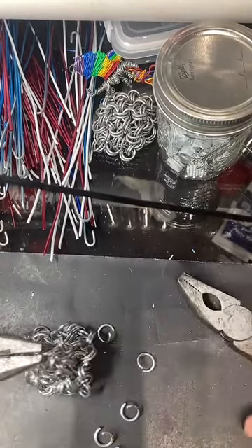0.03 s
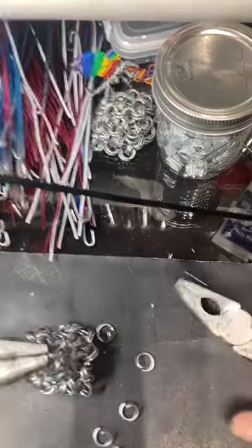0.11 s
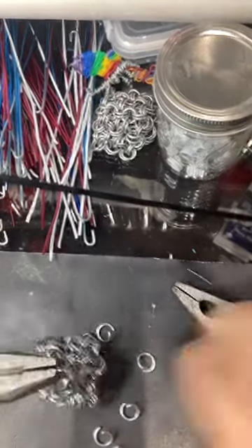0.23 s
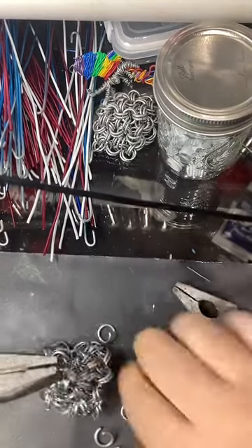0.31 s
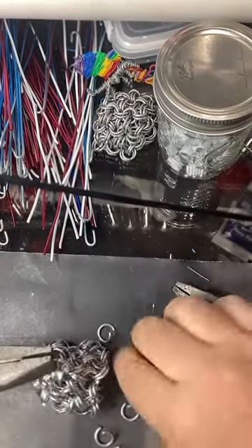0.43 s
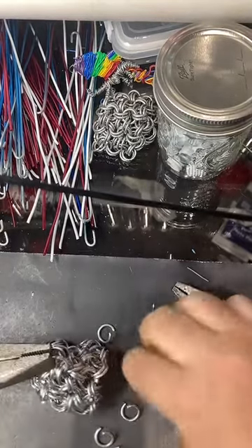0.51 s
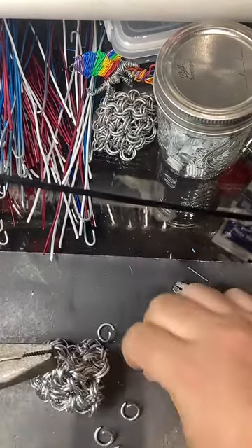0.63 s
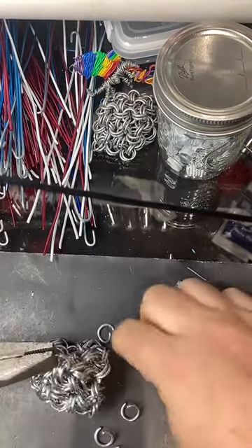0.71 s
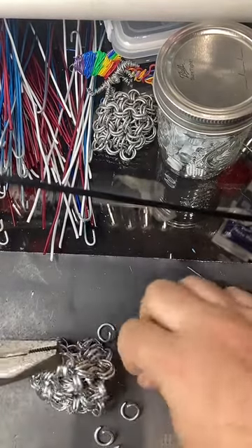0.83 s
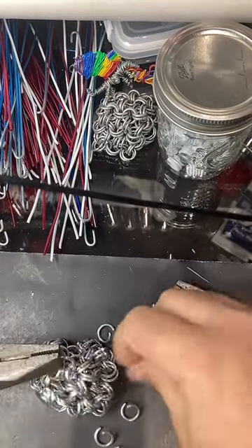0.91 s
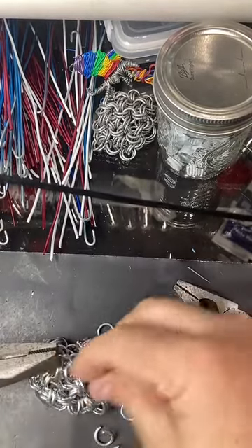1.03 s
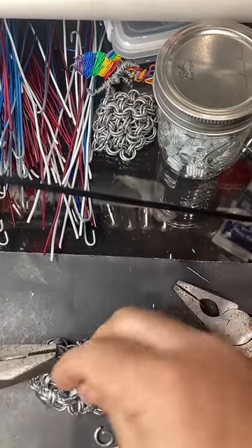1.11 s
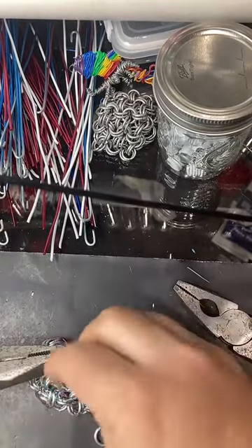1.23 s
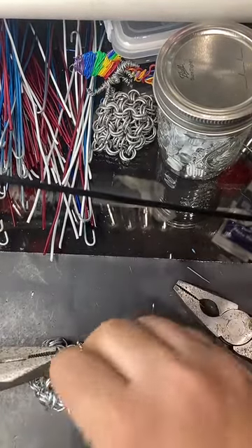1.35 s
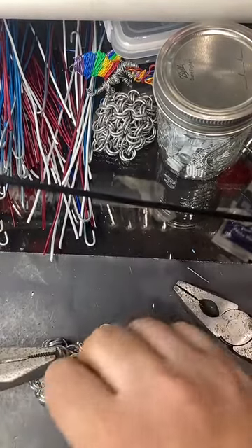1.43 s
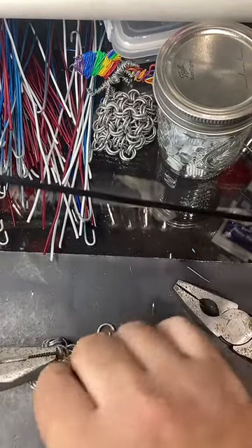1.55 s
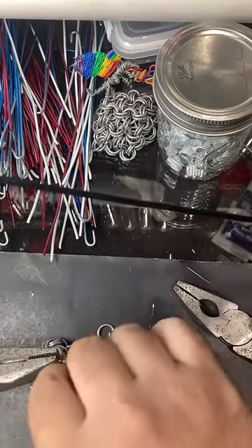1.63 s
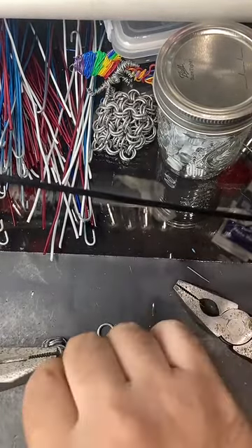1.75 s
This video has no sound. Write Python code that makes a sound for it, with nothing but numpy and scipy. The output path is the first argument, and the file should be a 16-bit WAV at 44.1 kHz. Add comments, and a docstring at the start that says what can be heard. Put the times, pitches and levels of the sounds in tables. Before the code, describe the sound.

Close pickup in a small room: tiny ring clicks, then pliers hit the table in one hard, rattling clack with a low thud and short metallic ring, followed by faint brushing, scattered clinks and quiet hum.

```python
"""Chain mail rustles and clicks; within a quarter second steel pliers land on a work table, clattering loudly.
Contacts are decaying noise bursts plus a chirped thud; pliers, table and a jar ring on as decaying sines.
Then fingers slide over the table and pick at the mail: swells of random slips, clinks of short modal rings.
A close pickup in a small room: centred direct sound, treble spread wide, air noise and a low mains hum."""
import sys
import numpy as np
from scipy import signal
from scipy.fft import rfft, irfft
from scipy.io import wavfile

SR = 44100
rng = np.random.default_rng(int(sys.argv[2]) if len(sys.argv) > 2 else 0)


def transcribe(signal):
    """Save signal, clipped to [-1, 1], as a 16-bit WAV file at the path in sys.argv[1]."""
    frames = np.atleast_2d(signal).T
    limited = np.clip(frames, -1, 1)
    pcm = np.round(limited * 32767).astype(np.int16)
    wavfile.write(sys.argv[1], SR, pcm)


N = 79380

# Contacts of the pliers as they land and rock.
# Each row: start in seconds, then levels of thud, knock, clatter and steel tick in dB.
CONTACTS = [(0.2376, -15, -18, -16.5, -27), (0.2411, -33.5, -9, -24.5, -7), (0.247, -31, -17.5, -15, -28.5),
            (0.249, -27.5, -11, -8.5, -20), (0.2550, -24, -16.5, -29.5, -20.5),
            (0.2650, -28.5, -23, -53, -34.5), (0.274, -39, -21.5, -18.5, -19), (0.2889, -38, -36, -32, -29),
            (0.3104, -33.5, -31, -26.5, -28), (0.3226, -35, -27, -36, -49.5),
            (0.345, -27, -62.5, -49, -54.5)]
CLICK_ROOM_SHARE = 0.45  # part of the ring clicks that passes through the room


def amp(db):
    """Decibels to gain."""
    return 10 ** (np.asarray(db) / 20)


def unit(x):
    """Scales to rms 1."""
    return x / np.sqrt(np.mean(x ** 2) + 1e-20)


def read(points, hz):
    """Interpolates a table on a log-frequency axis."""
    point_hz, value = np.transpose(points)
    return np.interp(np.log(hz + 1), np.log(point_hz + 1), value)


def add(mix, start_s, sound):
    """Lays a sound into the mix at its start time."""
    part = mix[max(round(start_s * SR), 0):][:len(sound)]
    part += sound[:len(part)]


def noise(colour, size):
    """Dense vibration of rms 1: the given spectrum with random phases."""
    hz = np.fft.rfftfreq(size, 1 / SR)
    phases = np.exp(2j * np.pi * rng.random(len(hz)))
    return unit(irfft(phases * amp(read(colour, hz)), size))


def decay(t, t60_s):
    """Exponential fall by 60 dB in t60."""
    return np.exp(-np.log(1000) * t / t60_s)


def struck(t, rise_s, t60_s):
    """Envelope of a blow: linear rise, exponential fall."""
    return np.minimum(t / rise_s, 1) * decay(t, t60_s)


def pliers():
    """Each contact gives a thud, a knock, a clatter and a steel tick; tiny bounces roughen the last two."""
    # Spectra of the parts. Each row: frequency in Hz, level in dB.
    knock = [(60, -34.5), (220, -13), (310, 0), (440, -7.5), (600, -0.5), (1080, -1.5), (1300, -8),
             (1750, -2), (2200, -20), (5000, -26), (13000, -54)]
    clatter = [(400, -19), (1500, -2.5), (2500, -1), (3300, -2.5), (3850, -1.5), (4250, -7), (4700, 0.5),
               (5150, -4.5), (6300, -10), (13000, -34)]
    tick = [(2000, -24.5), (5500, -12), (7000, -3.5), (8500, 5.5), (9800, -3.5), (11000, -9), (12300, -5.5),
            (13500, -30.5)]
    # spectrum, rise in s, t60 in s, roughened
    parts = [(knock, 0.00087, 0.055, False), (clatter, 0.0014, 0.066, True), (tick, 0.00045, 0.016, True)]
    crunch_per_s, crunch_db = 1500, 0.5
    out, t = np.zeros(N), np.arange(8192) / SR
    for start_s, thud_db, *levels_db in CONTACTS:
        add(out, start_s, amp(thud_db) * thud())
        bounces = rng.standard_normal(1024)
        bounce_db = crunch_db * np.interp(t * crunch_per_s, np.arange(len(bounces)), bounces)
        crunch = unit(amp(bounce_db))
        for db, (colour, rise_s, t60_s, roughened) in zip(levels_db, parts):
            burst = noise(colour, size=len(t)) * struck(t, rise_s, t60_s)
            add(out, start_s, amp(db) * (crunch if roughened else 1) * burst)
    return out


def thud(tilt_db_per_octave=0, size=8192):
    """One push runs through the table top as a falling chirp: delay goes as 1 / sqrt(frequency)."""
    # How the table top gives under a push. Each row: frequency in Hz, level in dB per Hz.
    push_colour = [(20, -33.5), (45, -9.5), (75, 0), (125, 2), (200, -5), (300, -0.5), (420, -6.5),
                   (620, -12), (900, -26), (3000, -64)]
    bend_delay_s, bend_hz = 0.01544, 98.8  # delay of the bending wave at bend_hz
    hz = np.fft.rfftfreq(size, 1 / SR)
    lag_turns = 2 * bend_delay_s * np.sqrt(bend_hz * hz)
    level_db = read(push_colour, hz) + tilt_db_per_octave * np.log2(1 + hz / bend_hz)
    wave = irfft(amp(level_db) * np.exp(-2j * np.pi * lag_turns), size)[:size // 2]
    return wave / np.abs(wave).max()


def steel_ring():
    """Every contact rings the same modes of the pliers, as hard as it clatters."""
    # Modes of the pliers. Each row: frequency in Hz, level in dB.
    steel_modes = [(1565, -17), (1610, -15), (1792, -18), (1884, -19), (2332, -15.5), (2500, -19),
                   (2767, -20.5), (3240, -22), (3604, -25), (3683, -21.5), (4680, -23), (5122, -22),
                   (5460, -26.5), (8910, -27)]
    rise_s, t60_s = 0.002, 0.15
    out, t = np.zeros(N), np.arange(SR // 2) / SR
    for start_s, _, _, clatter_db, _ in CONTACTS:
        tone = sum(amp(db) * np.sin(2 * np.pi * (hz * t + rng.random())) for hz, db in steel_modes)
        add(out, start_s, amp(clatter_db) * tone * struck(t, rise_s, t60_s))
    return out


def table_ring():
    """Table and jar ring in decaying modes; the table's fade faster from 0.57 s, while the jar's ring on."""
    # Modes of the table and of the jar that stands by. Each row: frequency in Hz, level in dB, t60 in seconds.
    table_modes = [(112.6, -24.5, 0.82), (174.5, -23.5, 0.51), (301, -14, 0.085), (521.3, -23.5, 0.29),
                   (643.8, -14.5, 0.065), (653.5, -21, 0.63), (806, -18.5, 0.14), (989.5, -19, 0.19),
                   (1011.5, -21, 0.19), (1084.5, -17.5, 0.17), (1108, -22.5, 0.2), (1220, -25.5, 0.37)]
    jar_modes = [(325, -42, 2.1), (368, -47.5, 2.4), (938, -53.5, 2), (1222, -58.5, 5.1),
                 (1320, -51.5, 1.6), (2070, -56, 2.6), (3290, -66.5, 3.7), (3450, -49, 1.1),
                 (3725, -58.5, 2.6), (3763, -64.5, 4.9)]
    start_s, rise_s = 0.2415, 0.005
    faster_fade_s, faster_fade_t60_s = 0.57, 0.22
    out, t = np.zeros(N), np.arange(N) / SR
    fade = decay(np.maximum(start_s + t - faster_fade_s, 0), faster_fade_t60_s)
    for modes, gain in [(table_modes, fade), (jar_modes, 1)]:
        for hz, db, t60_s in modes:
            tone = np.sin(2 * np.pi * hz * t) * struck(t, rise_s, t60_s)
            add(out, start_s, amp(db) * gain * tone)
    return out


def bumps():
    """Hand and tool meet the table with dull thumps, chirped like the thuds."""
    # Each row: start in seconds, level in dB, brightness in dB per octave.
    bump_rows = [(0.1746, -34.5, -2), (0.203, -38, -21), (0.303, -21, -6), (0.660, -44, -11),
                 (0.689, -52.5, -20.5), (0.754, -40.5, -17.5), (0.773, -42, -21.5), (0.879, -43.5, -16),
                 (1.361, -50.5, -5), (1.485, -47, 2)]
    out = np.zeros(N)
    for start_s, db, tilt_db_per_octave in bump_rows:
        add(out, start_s, amp(db) * thud(tilt_db_per_octave))
    return out


def clicks():
    """Small rings snap against each other; the fingers damp them at once."""
    # Each row: start in seconds, level in dB, main pitch in Hz, t60 in seconds, other modes in dB,
    # dry snap against the tone in dB.
    click_rows = [(0.0807, -36, 7740, 0.03, -7, 0), (0.094, -45, 7900, 0.024, -2, 5),
                  (0.118, -41, 5550, 0.017, -3, 0), (0.128, -33, 5360, 0.022, 1, -7),
                  (0.3455, -31, 5950, 0.017, -10, -12.5), (0.506, -48, 6700, 0.011, 6, 4),
                  (0.539, -40.5, 6720, 0.013, 6, -12), (0.565, -36, 6820, 0.0039, 1, -6),
                  (0.6242, -48.5, 7140, 0.05, -9.5, 3), (0.7180, -29, 6600, 0.0069, -3.5, -9.5),
                  (0.7496, -51, 7570, 0.015, -4.5, 6), (0.8840, -22, 6805, 0.008, 2, -7),
                  (1.3221, -49, 5780, 0.02, -9, -1.5), (1.5842, -52, 4170, 0.015, -13, 3),
                  (1.6760, -44, 5063, 0.02, 4, 6.5)]
    out = np.zeros(N)
    for start_s, db, *ring in click_rows:
        add(out, start_s, amp(db) * clink(*ring))
    return out


def clink(pitch_hz, t60_s, others_db=0, snap_db=0):
    """One small ring: its main mode, its other modes and a dry snap."""
    # Modes of a ring pinched in the weave. Each row: ratio to the main pitch, level in dB.
    ring_modes = [(.36, -13), (0.481, -14.5), (0.87, -17), (1, -1.5), (1.22, -10.5), (1.411, -13),
                  (1.6, -16.5), (1.77, -17.5), (2.28, -14.5)]
    # Spectrum of the snap. Each row: frequency in Hz, level in dB.
    snap_colour = [(300, -10), (1500, -8), (2700, -11.5), (4000, -6.5), (6000, -1), (8000, 1), (9500, -4.5),
                   (13000, -11)]
    rise_s = 0.0008
    t = np.arange(2048) / SR
    tone = np.zeros(len(t))
    for ratio, db in ring_modes:
        mode_db = db + others_db * (ratio != 1)
        tone += amp(mode_db) * np.sin(2 * np.pi * (pitch_hz * ratio * t + rng.random()))
    snap = amp(snap_db) * noise(snap_colour, size=len(t))
    return (tone + snap) * struck(t, rise_s, t60_s)


def rattle(count=30):
    """Loose rings tick at random on the shaken table, on average ever more faintly."""
    start_s, ticks_per_s, tick_t60_s = 0.29, 210, 0.012
    level_db, spread_db, fade_t60_s = -38.5, 2.5, 0.7
    lowest_hz, highest_hz = 3640, 8420
    out = np.zeros(N)
    for k, (when, size, strength) in enumerate(rng.random((count, 3))):
        after_s = (k + when) / ticks_per_s
        gain = amp(level_db - spread_db * np.log(strength)) * decay(after_s, fade_t60_s)
        pitch_hz = np.interp(size, [0, 1], [lowest_hz, highest_hz])
        add(out, start_s + after_s, gain * clink(pitch_hz, tick_t60_s))
    return out


def rubs():
    """Each rub is a swell of tiny slips over a soft hiss; the grip catches and lets go unevenly."""
    # Rubs of fingers and chain mail over the table.
    # Each row: peak in seconds, rise in seconds, fall in seconds, level in dB, brightness in dB per octave.
    rub_rows = [(0.011, 0.018, 0.026, -40, 2), (0.089, 0.017, 0.028, -47, 3.5),
                (0.133, 0.0094, 0.021, -43.5, 1.5), (0.202, 0.05, 0.082, -52.5, 2.5),
                (0.44, 0.085, 0.061, -51, -1), (0.552, 0.016, 0.029, -53, 0.5),
                (0.68, 0.036, 0.16, -61, -0.5), (0.864, 0.014, 0.013, -39.5, 14.5),
                (0.905, 0.021, 0.034, -54, 4.5), (1.042, 0.03, 0.02, -50.5, 1), (1.1, .012, .02, -60, 1.5),
                (1.495, 0.021, 0.034, -56.5, -9.5)]
    # Spectrum of rubbing. Each row: frequency in Hz, level in dB.
    rub_colour = [(150, -3.5), (600, 1.5), (1500, -3), (3200, -1.5), (4400, -4.5), (5500, -2.5), (8000, -3),
                  (10500, -12.5), (13000, -13.5)]
    slips_per_s, slip_spread_db, hiss_gain = 4400, 2.5, 0.63
    catch_per_s, catch_db = 230, 2
    out, t, hz = np.zeros(N), np.arange(N) / SR, np.fft.rfftfreq(N, 1 / SR)
    slips = (rng.random(N) < slips_per_s / SR) * rng.choice([-1, 1], N)
    slips = slips * amp(slip_spread_db * np.minimum(rng.exponential(1, N), 4))
    grip = amp(catch_db * np.interp(t * catch_per_s, np.arange(N), rng.standard_normal(N)))
    friction = rfft(grip * (unit(slips) + hiss_gain * rng.standard_normal(N)))
    for peak_s, rise_s, fall_s, db, tilt_db_per_octave in rub_rows:
        swell = np.exp(-((t - peak_s) / np.where(t < peak_s, rise_s, fall_s)) ** 2 / 2)
        colour_db = read(rub_colour, hz) + tilt_db_per_octave * np.log2(hz + 1)
        out += amp(db) * swell * unit(irfft(friction * amp(colour_db), N))
    return out


def room(x):
    """Adds separate, slightly dull reflections from the things on the table, and the tail of the room."""
    early_db, early_delay_s, early_rise_s, early_t60_s = -11.5, 0.005, 0.0084, 0.15
    early_per_s, early_top_hz = 700, 7500
    early = rng.choice([-1, 1], SR) * (rng.random(SR) < early_per_s / SR)
    early = early * struck(np.arange(SR) / SR, early_rise_s, early_t60_s)
    early = signal.lfilter(*signal.butter(1, early_top_hz, fs=SR), early)
    response = tail()
    add(response, early_delay_s, amp(early_db) * early / np.linalg.norm(early))
    return x + signal.fftconvolve(x, response)[:N]


def tail():
    """Response of the diffuse room: noise that dies band by band."""
    # Each row: frequency in Hz, t60 in seconds.
    room_t60 = [(80, 1.5), (300, 2.4), (1000, 0.71), (3000, 0.69), (8000, 0.59), (13000, 0.3)]
    # Each row: frequency in Hz, level in dB.
    room_db = [(80, -13), (270, -22.5), (480, -19), (830, -21), (1200, -14), (3000, -15.5), (5000, -20.5),
               (8000, -17.5), (13000, -13)]
    delay_s = 0.012
    hz, at_s, bands = signal.stft(rng.standard_normal(SR), SR, nperseg=256)
    t60_s = read(room_t60, hz)[:, None]
    unit_energy = np.sqrt(2 * np.log(1000) / (t60_s * SR))
    bands = bands * amp(read(room_db, hz))[:, None] * decay(at_s, t60_s) * unit_energy
    response = np.zeros(SR)
    add(response, delay_s, signal.istft(bands, SR, nperseg=256)[1])
    return response


def room_tone():
    """Dull air noise of drifting level, and mains hum as two steady sines."""
    # Spectrum of the air. Each row: frequency in Hz, level in dB per Hz.
    air_colour = [(20, -18), (40, -10), (65, -6.5), (125, -3), (240, -4), (330, -6), (580, -16.5),
                  (1000, -15.5), (2000, -22), (4500, -29), (9000, -31), (13000, -42.5)]
    # Level of the air. Each row: time in seconds, level in dB.
    air_db = [(0, -56), (0.6, -58), (1.1, -54.5), (1.5, -54), (1.65, -60), (1.8, -59)]
    # Each row: frequency in Hz, level in dB rms.
    hum_tones = [(59.3, -61.5), (118.5, -62)]
    t = np.arange(N) / SR
    hum = sum(amp(db) * np.sqrt(2) * np.sin(2 * np.pi * (hz * t + rng.random())) for hz, db in hum_tones)
    air = noise(air_colour, size=N) * amp(np.interp(t, *np.transpose(air_db)))
    return hum + air


def scene():
    """Direct sounds sit in the centre; the treble of late reverberation, rubs and air spreads wide."""
    # Level of the wide part: almost none below 3 kHz, strong from 4.7 kHz up.
    # Each row: frequency in Hz, side level in dB.
    side_db = [(2800, -69.5), (3800, -19.5), (4700, -3.5), (8000, -1), (12000, 2.5)]
    rub_side_db, air_side_db, spread_s = -13, -2.5, 0.09
    near = clicks() + rattle()
    sent = pliers() + bumps() + CLICK_ROOM_SHARE * near
    mid = room(sent) + (1 - CLICK_ROOM_SHARE) * near
    mid += table_ring() + steel_ring() + rubs() + room_tone()
    spread = np.minimum(np.arange(SR) / SR / spread_s, 1) ** 6  # keeps the early tail centred
    diffuse = signal.fftconvolve(sent, tail() * spread)[:N]
    diffuse += amp(rub_side_db) * rubs() + amp(air_side_db) * room_tone()
    side = irfft(rfft(diffuse) * amp(read(side_db, np.fft.rfftfreq(N, 1 / SR))), N)
    return np.array([mid + side, mid - side])


def record(dry):
    """Peaks round off smoothly below a ceiling; then a linear-phase low-pass limits the band."""
    ceiling, edge_hz = 0.88, 13150
    rounded = dry / (1 + (dry / ceiling) ** 6) ** (1 / 6)
    low_pass = signal.firwin(511, edge_hz, window=("kaiser", 9), fs=SR)
    return signal.oaconvolve(rounded, low_pass[None], "same")


dry = scene()
out = record(dry)
transcribe(out)
```